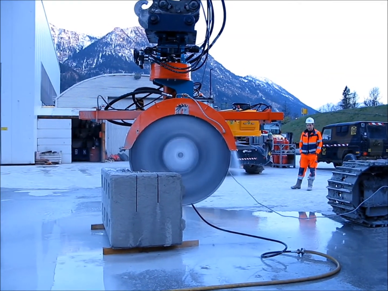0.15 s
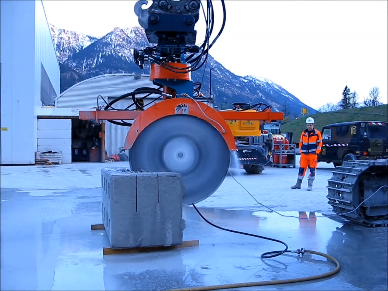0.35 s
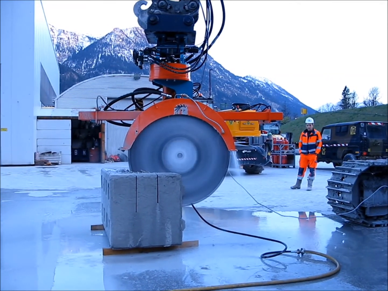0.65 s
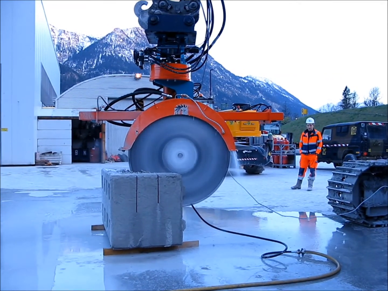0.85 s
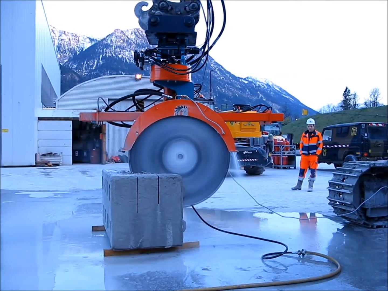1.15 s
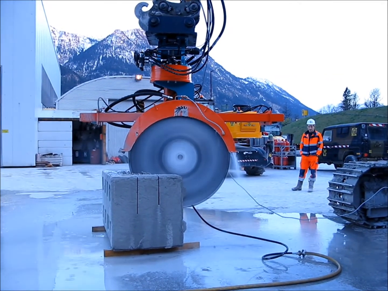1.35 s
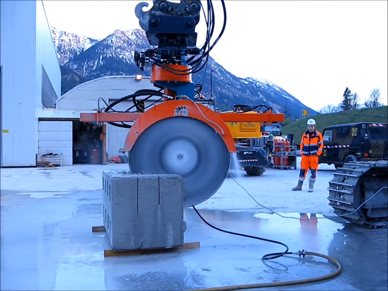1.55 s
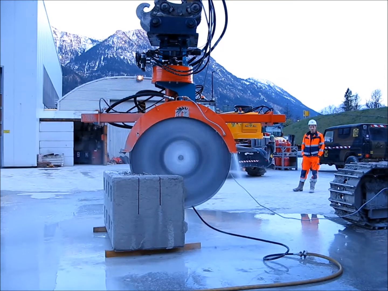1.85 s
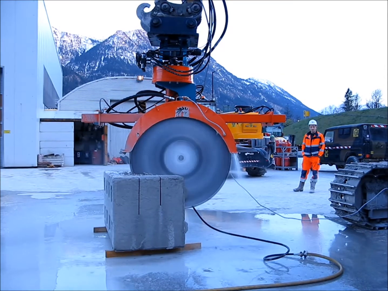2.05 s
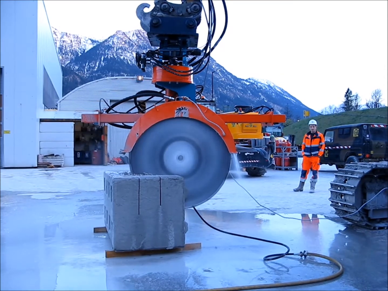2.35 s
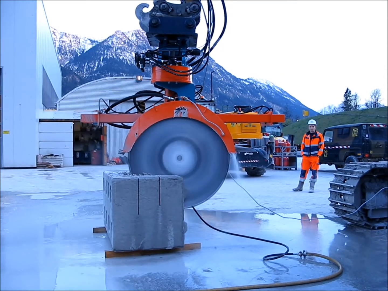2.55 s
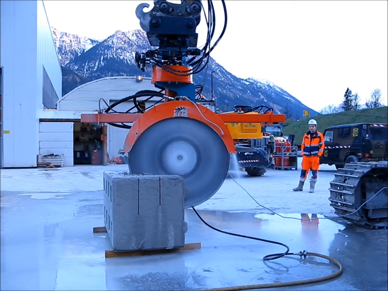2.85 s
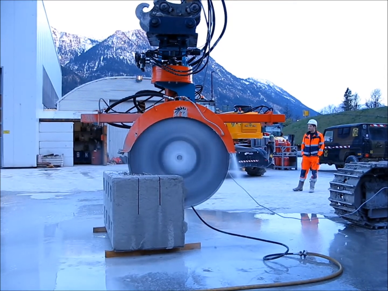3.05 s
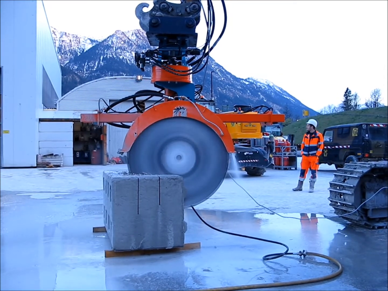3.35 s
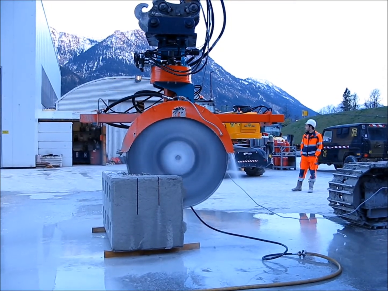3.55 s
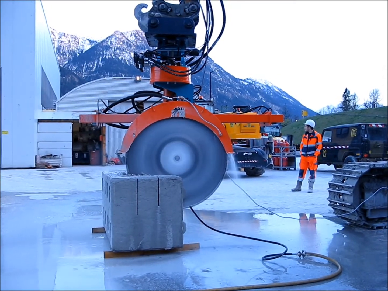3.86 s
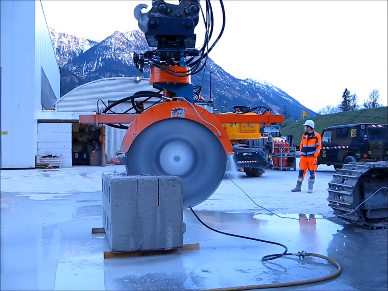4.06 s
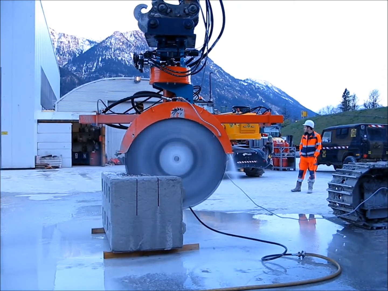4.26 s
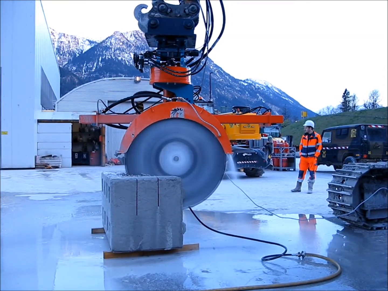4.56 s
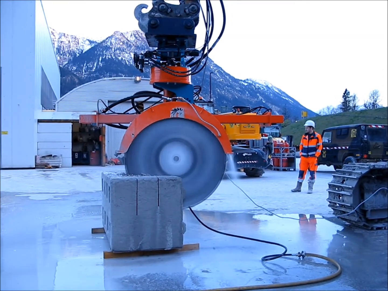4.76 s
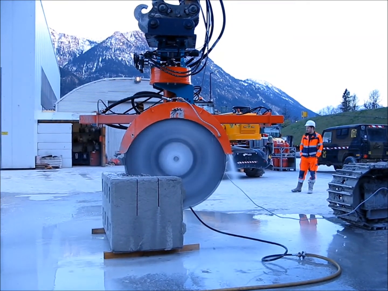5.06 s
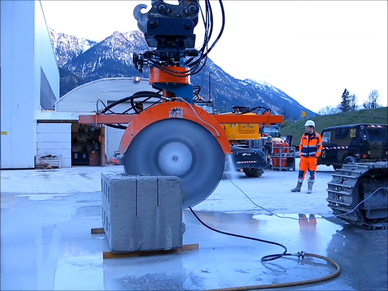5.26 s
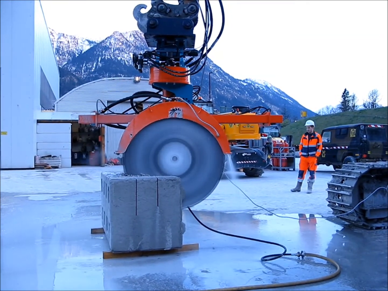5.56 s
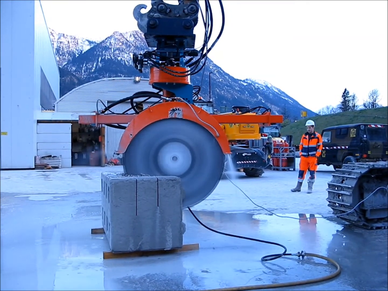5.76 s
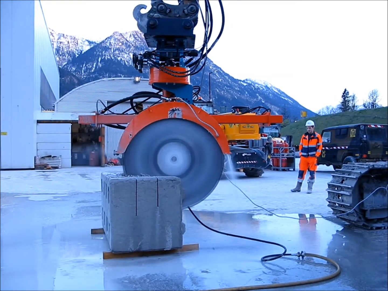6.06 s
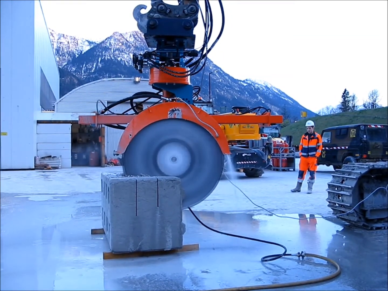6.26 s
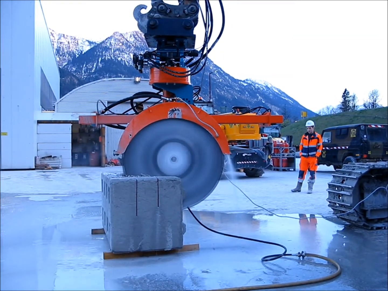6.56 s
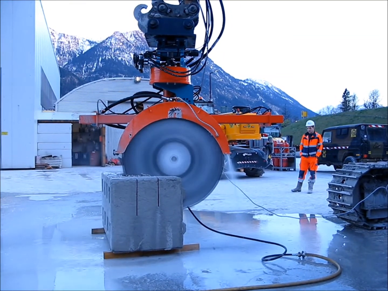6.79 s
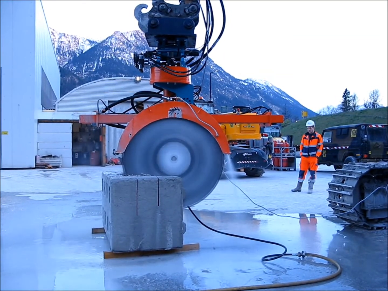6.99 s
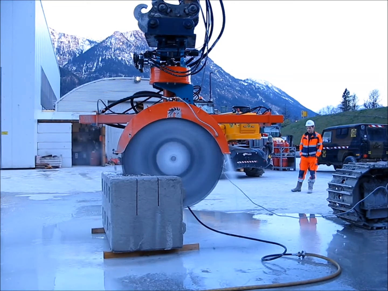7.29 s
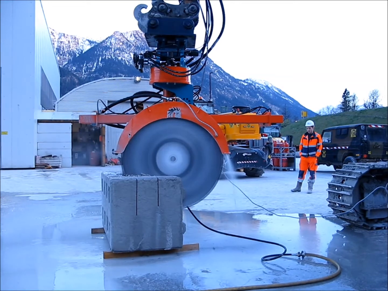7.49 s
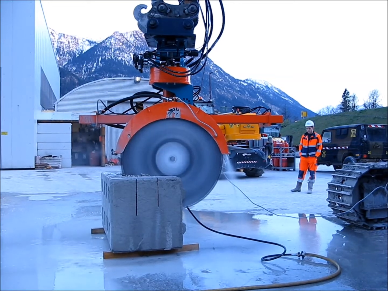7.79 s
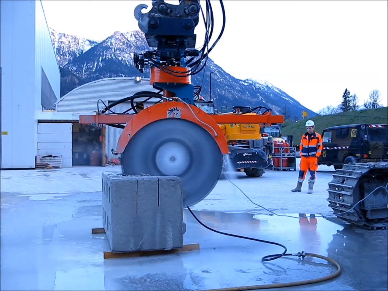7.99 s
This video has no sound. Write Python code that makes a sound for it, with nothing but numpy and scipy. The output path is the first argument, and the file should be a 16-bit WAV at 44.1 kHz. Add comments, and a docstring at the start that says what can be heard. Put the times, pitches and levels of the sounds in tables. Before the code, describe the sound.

A big water-cooled diamond saw grinds steadily into concrete outdoors, a shrill, hissing metallic ring pulsing rapidly over a faint diesel drone.

```python
"""A big diamond blade on an excavator arm grinds steadily into a concrete block in an open yard.
Noise for the scratching and clicks for the chipping ring through the resonances of disc and guard.
The rim runs slightly out of true, so the pressure on the cut rises and falls once a turn.
Hard stones grumble briefly; sines and noise make the segment hum and the shaken block,
and a diesel with its pump drones behind as a stack of sines over a low rumble."""
import sys
import numpy as np
from scipy import signal
from scipy.fft import rfft, irfft, next_fast_len
from scipy.io import wavfile

SR = 44100
rng = np.random.default_rng(int(sys.argv[2]) if len(sys.argv) > 2 else 0)


def generate_wav(sig):
    """Save sig (samples, or channels by samples) to the path in sys.argv[1] as 16-bit PCM at SR."""
    pcm = np.round(np.clip(np.atleast_2d(sig).T, -1, 1) * 32767).astype(np.int16)
    wavfile.write(sys.argv[1], SR, pcm)


N = 358533
TIME = np.arange(N) / SR  # s
SEGMENT_COUNT = 60  # diamond segments round the rim


def grinding(turns, level_db, throb, sand_db, sing_db, gravel_db):
    """Scratching and chipping, pressed unevenly over each turn, ring through guard and disc."""
    # overall colour of the grinding noise: f/Hz, relative level per Hz/dB
    grind_spectrum = [(150, -89.5), (330, -82.5), (480, -81.5), (800, -75), (1080, -78.5), (1400, -71.5),
                      (2550, -69), (3000, -64), (3600, -59.5), (4600, -64.5), (5500, -66), (6300, -71),
                      (7900, -62.5), (9500, -66.5), (12400, -68.5), (14200, -67.5), (16000, -72.5)]
    # pressure round the rim: share of a turn, level/dB at throb 1
    runout = [(.03, -0.3), (.14, 0), (.25, 0.5), (.35, 0.9), (.44, 1.5), (.48, -0.3), (.57, 1.4),
              (.63, 1.75), (.7, 3), (.79, 1.8), (.86, 2.4), (.94, -1.5)]
    # resonances of the guard and low bending modes of the disc: f/Hz, width/Hz, boost/dB
    guard_modes = [(928, 96, 7.5), (994, 27, 5.5), (1141, 27, 3), (1238, 64, 5.5), (1255, 53, 4.5),
                   (1210, 130, 2.5), (1311, 18, 9), (1492, 33, 4.5), (1560, 140, 1.5), (1591, 20, 6.5),
                   (2000, 17, 0.5), (2120, 78, 5), (2304, 31, 7), (2200, 170, 1.3), (2416, 55, 4.5)]
    # high modes of the steel disc: f/Hz, width/Hz, boost/dB
    blade_modes = [(2620, 32, 2.5), (2784, 96, 5.5), (2954, 42, 6), (3104, 21, 6.5), (3500, 120, 2),
                   (4260, 78, 7), (4840, 124, 5), (5085, 63, 5.5), (5510, 44, 8.5), (5990, 41, 7.5),
                   (6150, 100, 3.5), (6370, 21, 11.5), (6550, 16, 8), (7000, 45, 7), (7430, 20, 8),
                   (7800, 22, 2.5), (8700, 38, 4), (10600, 200, 2), (11175, 180, 2.5), (11500, 200, 1.5),
                   (13027, 50, -1.5), (13260, 200, 3), (14200, 50, 8), (14300, 25, 6.3), (14000, 46, 3),
                   (14520, 100, 7.5), (14900, 110, 13.5)]

    # coarse scratches partly recur every turn, the finest ones are always new
    fine_hz = 4200
    coarse_scratch = band(rim_noise(turns, memory=0.52), fine_hz, "low", order=1)
    fine_scratch = band(rng.standard_normal(N), fine_hz, "high", order=1)
    chipping = from_db(-9) * chips(per_s=2500, spread_db=2.5)
    noise = coloured(coarse_scratch + fine_scratch + chipping, grind_spectrum)
    gravel, ring, whine, sing, sand = split(noise, edges_hz=[2570, 3980, 6400, 9450])

    share, pressure_db = np.transpose(runout)
    bite_db = throb * np.interp(turns, share, pressure_db, period=1) + 0.5 * drift(25)
    # each segment strikes the edge of the cut
    entry_db = 0.23 * np.cos(2 * np.pi * SEGMENT_COUNT * turns)

    # the families of modes flare up independently as the contact moves about
    flare_db = 0.7
    families = (ring, whine, from_db(sing_db) * sing)
    ringing = sum(from_db(flare_db * drift(2.8)) * family for family in families)

    # the steel's ring and hiss follow the pressure; the coarse rasp hardly does
    bright_ring = from_db(bite_db + entry_db) * ringing
    hiss = from_db(0.93 * bite_db + entry_db + sand_db) * sand
    rasp = from_db(gravel_db + 0.077 * bite_db + 1.04 * drift(14)) * gravel

    through_guard = resonate(bright_ring + hiss + rasp, guard_modes)
    steel = shimmer(resonate(through_guard, blade_modes))
    return from_db(level_db) * rms_one(steel)


def pebbles():
    """A hard stone in the cut makes the block grumble for a moment: a swell of band noise."""
    # hard stones: t/s, length/s, low f/Hz, high f/Hz, level at the peak/dB
    stones = [(4.64, 0.14, 315, 500, -50.5), (5.89, 0.11, 630, 710, -53), (6.42, 0.066, 534, 700, -42.5)]
    out = np.zeros(N)
    for s, length, low_hz, high_hz, db in stones:
        grumble = rms_one(band(rng.standard_normal(N), [low_hz, high_hz], "band"))
        out += from_db(db) * swell(s, length) * grumble
    return out


def blade_hum(turns, thrum_db):
    """Sines at the segment rate and drive rates, and the block shaken partly alike each turn."""
    # hum of the segments: t/s, level/dB
    segment_hum = [(0, -56), (.65, -48), (1.85, -62), (2.12, -48.5), (2.9, -49.5), (3.5, -47), (4.3, -47),
                   (5.1, -65), (6.6, -65), (7, -53.5), (7.9, -49), (8.13, -55)]
    # tones of the blade drive: multiple of the turn rate, level before the thrum curve/dB
    drive_orders = [(37, -79), (38, -70.5), (41, -78), (48, -70), (50, -66), (52, -65.5)]
    # the block shaken by the rim: f/Hz, relative level per Hz/dB
    thrum_spectrum = [(200, -30), (330, -7), (390, 2), (480, -7.5), (560, 8), (680, -27), (900, -23)]

    hum_db, = in_time(segment_hum)
    segment_orders = [(SEGMENT_COUNT, 0), (2 * SEGMENT_COUNT, -13)]
    segments = from_db(hum_db) * tones(turns, segment_orders, waver_db=0.5)
    block = from_db(-55.5) * coloured(rim_noise(turns, memory=0.63), thrum_spectrum)
    drive = tones(turns, drive_orders, waver_db=4.0)
    return segments + from_db(thrum_db) * (block + drive)


def excavator():
    """A diesel at nearly steady speed drones with its piston pump, over a low rumble."""
    # diesel and pump: multiple of the crank rate, level/dB
    engine_orders = [(2, -60), (4, -82.5), (6, -74), (8, -75), (9, -65.5), (10, -72), (12, -59), (15, -64),
                     (18, -56.5), (24, -64.5)]
    # rumble of the machine: f/Hz, relative level per Hz/dB
    rumble_spectrum = [(15, -13), (35, -11), (65, 7), (110, 2), (220, -6.5), (400, -20), (1000, -23)]
    crank_hz = 31.34  # average speed
    crank_turns = np.cumsum(crank_hz * (1 + 0.001 * drift(1.5))) / SR
    drone = tones(crank_turns, engine_orders, waver_db=1.6)
    rumble = from_db(-64.0) * coloured(rng.standard_normal(N), rumble_spectrum)
    return drone + rumble


def rim_noise(turns, memory):
    """The same diamonds come round again: each turn keeps a share of the last one's roughness."""
    keep = np.clip(memory, 0, 0.98)
    size = int(N / turns[-1])  # samples in an average turn
    rim = rng.standard_normal((int(turns[-1]) + 1, size))
    for k in range(1, len(rim)):
        rim[k] = keep * rim[k - 1] + np.sqrt(1 - keep ** 2) * rim[k]
    return rim.ravel()[(turns * size).astype(int)]


def chips(per_s, spread_db):
    """Grains of stone breaking out: random clicks of uneven size, rms 1."""
    size_db = spread_db * np.minimum(rng.exponential(1, N), 4)
    sizes = from_db(size_db) * rng.choice([-1, 1], N)
    return rms_one(sizes * (rng.random(N) < per_s / SR))


def resonate(x, modes):
    """Resonances boost their own pitches: a chain of peaking filters, one for each mode."""
    hz, width, db = np.transpose(modes)
    a, lift = np.tan(np.pi * width / SR), from_db(db / 2)
    c = -2 * np.cos(2 * np.pi * hz / SR)
    sos = np.stack([1 + a * lift, c, 1 - a * lift, 1 + a / lift, c, 1 - a / lift], axis=1)
    return signal.sosfilt(sos / sos[:, 3:4], x)


def shimmer(x):
    """The disc's countless weak modes add a short, dense ring: a tail of fading noise."""
    t60, share = 0.13, 0.21  # time to fade by 60 dB (s), strength of the tail
    size = int(t60 * SR)
    tail = rng.standard_normal(size) * from_db(-60 * np.arange(size) / (t60 * SR))
    return x + share * signal.fftconvolve(x, tail / np.linalg.norm(tail))[:N]


def tones(turns, orders, waver_db):
    """Sines locked to a shaft, each wavering in strength."""
    total = 0
    for k, db in orders:
        strength = np.sqrt(2) * from_db(db + waver_db * drift(2.9))
        total = total + strength * np.sin(2 * np.pi * (round(k) * turns + rng.random()))
    return total


def split(x, edges_hz):
    """Cut a steady noise into neighbouring bands that add up to it again."""
    below = []
    for hz in edges_hz:
        low_pass = signal.butter(4, hz, fs=SR, output="sos")
        below.append(signal.sosfiltfilt(low_pass, x))  # both ways, so the bands stay in step
    return np.diff([0 * x, *below, x], axis=0)


def coloured(x, spectrum):
    """Give a steady noise a spectrum; rms 1."""
    size = next_fast_len(N)
    hz, db = np.transpose(spectrum)
    bin_hz = np.arange(size // 2 + 1) * SR / size
    gain = from_db(np.interp(np.log(bin_hz + 1), np.log(hz), db))
    return rms_one(irfft(rfft(x, size) * gain, size)[:N])


def band(x, hz, kind, order=2):
    """Keep part of the spectrum with a Butterworth filter."""
    sos = signal.butter(order, np.clip(hz, 10, 0.45 * SR), kind, fs=SR, output="sos")
    return signal.sosfilt(sos, x)


def drift(rate):
    """Smooth random wandering, mostly slower than about `rate` Hz, with rms 1."""
    # low-passed noise made at every 40th sample; the first 2000 values let the filter settle
    r = np.exp(-80 * np.pi * rate / SR)
    noise = rng.standard_normal(N // 40 + 2002)
    slow = signal.lfilter([1], [1, -2 * r, r * r], noise)[2000:]
    return np.interp(np.arange(N) / 40, np.arange(len(slow)), rms_one(slow))


def swell(s, length):
    """A smooth hump of height 1 around a moment."""
    return np.exp(-(2 * (TIME - s) / length) ** 2)


def in_time(rows):
    """Each column of a curve, sample by sample."""
    s, *columns = np.transpose(rows)
    return [np.interp(TIME, s, c) for c in columns]


def rms_one(x):
    """Scale to rms 1."""
    return x / np.sqrt(np.mean(x ** 2) + 1e-20)


def from_db(db):
    """Decibels to gain."""
    return 10 ** (np.asarray(db) / 20)


def scene():
    """Saw and machine, both straight ahead: feed sets the grinding level, other curves its colour."""
    # blade speed: t/s, segments entering the cut per s
    speed = [(0, 571.9), (1, 570.2), (1.9, 571.7), (3.2, 570.1), (4.3, 572.5), (5.3, 569.8), (5.7, 573.2),
             (6, 571), (7.6, 570.8), (8.13, 569.4)]
    # feed into the cut: t/s, grinding level/dB
    feed = [(0, -22.5), (.8, -22.5), (1.65, -23.5), (1.87, -22.5), (2.95, -23), (3.3, -22), (3.8, -23.5),
            (4.4, -22.5), (4.75, -22), (5, -22.5), (5.7, -23), (7.25, -23), (8.13, -23.5)]
    # treble of the grinding, which singing and hiss follow: t/s, level/dB
    treble = [(0, 1), (1.5, 0.96), (3.4, 0.7), (3.8, -0.1), (4.4, -1.5), (5.5, -0.5), (6.7, .5),
              (8.13, 0.5)]
    # thrum of block and drive: t/s, level/dB
    block_thrum = [(0, -6), (1.9, -3), (3.1, 5), (4.1, 2.5), (4.95, 3), (5.7, 1.5), (6.55, 1.5),
                   (8.13, 1.5)]
    # the once-a-turn throb wanders deeper for a moment: t/s, extra depth
    throb_swells = [(1.1, 0.51), (1.85, 0.49), (2.42, 0.55), (3.05, .3), (3.62, .45), (4.02, .7),
                    (4.38, 0.27), (5.4, 0.49), (5.98, 0.45), (7.12, 0.66), (7.58, 0.68)]
    # the rasp grows a little louder for a moment: t/s, length/s, extra level/dB
    rasp_swells = [(1.15, 0.66, 1), (4.98, 0.14, 1.8), (6.6, 0.9, 1)]

    turns = np.cumsum(in_time(speed)[0]) / SR / SEGMENT_COUNT
    level_db, treble_db, thrum_db = (in_time(curve)[0] for curve in (feed, treble, block_thrum))

    base_throb, swell_s = 0.74, 0.23  # usual throb depth, length of a throb swell
    throb = base_throb + sum(depth * swell(s, swell_s) for s, depth in throb_swells)

    # hiss of fine sand: dB, dB per dB of treble, share of the feed's swing it ignores
    sand_base_db, sand_follows, sand_steadiness = -0.5, 0.6, 0.55
    feed_swing_db = level_db - level_db.mean()
    sand_db = sand_base_db + sand_follows * treble_db - sand_steadiness * feed_swing_db

    sing_db = 0.16 + 1.25 * treble_db  # shrill singing of the disc
    gravel_db = -0.17 + sum(db * swell(s, length) for s, length, db in rasp_swells)

    cut = grinding(turns, level_db, throb, sand_db, sing_db, gravel_db) + pebbles()
    yard = cut + blade_hum(turns, thrum_db) + excavator()
    return np.stack([yard, yard])


def record(dry):
    """The top is cut steeply by an elliptic low-pass filter."""
    cutoff_hz = 15750
    low_pass = signal.ellip(14, 0.1, 80, cutoff_hz, fs=SR, output="sos")
    return signal.sosfilt(low_pass, dry)


dry = scene()
out = record(dry)
generate_wav(out)
```